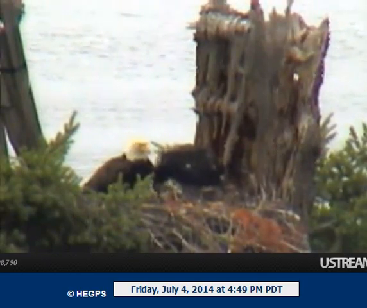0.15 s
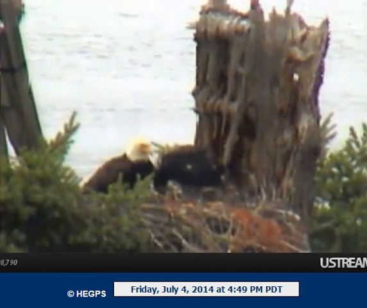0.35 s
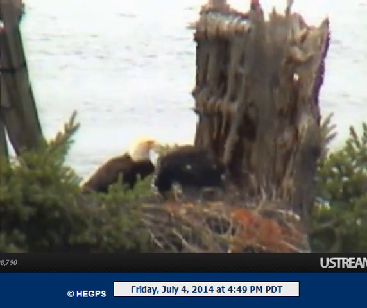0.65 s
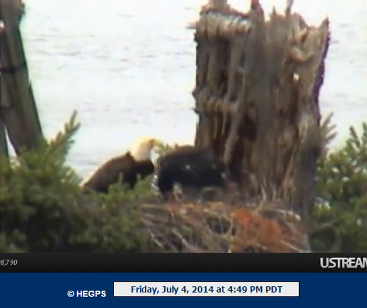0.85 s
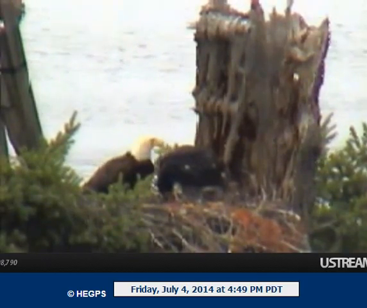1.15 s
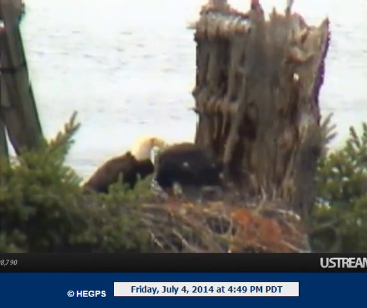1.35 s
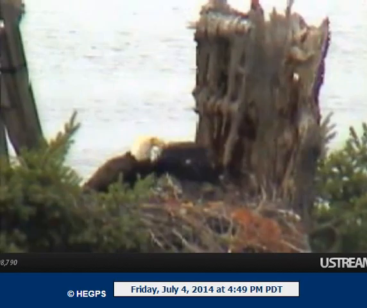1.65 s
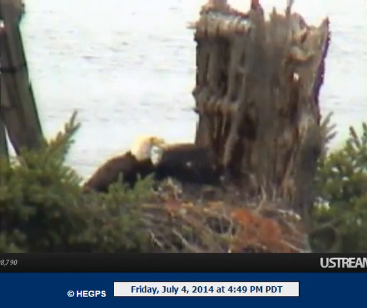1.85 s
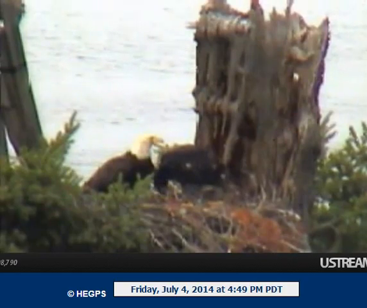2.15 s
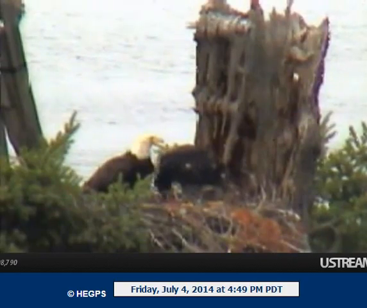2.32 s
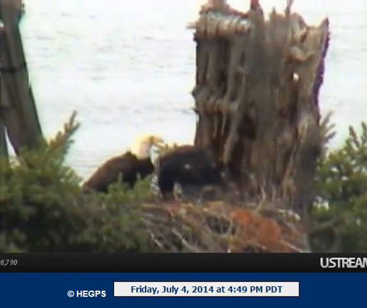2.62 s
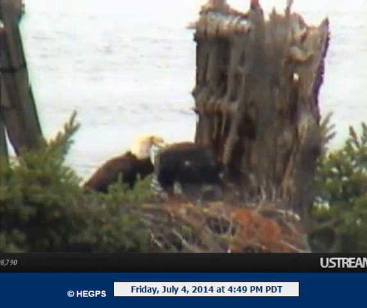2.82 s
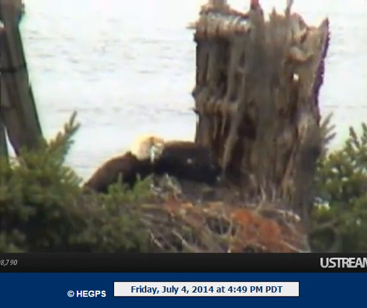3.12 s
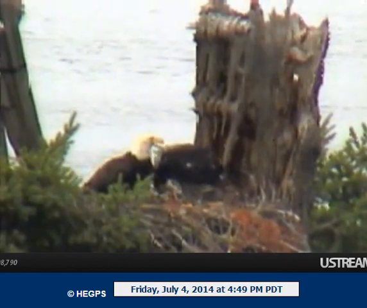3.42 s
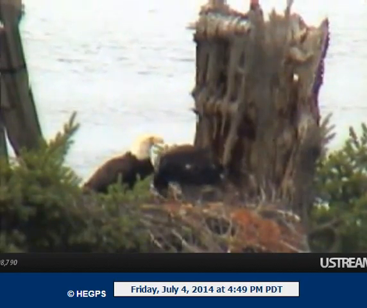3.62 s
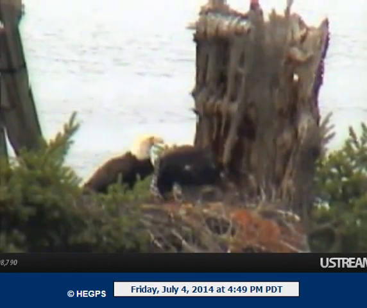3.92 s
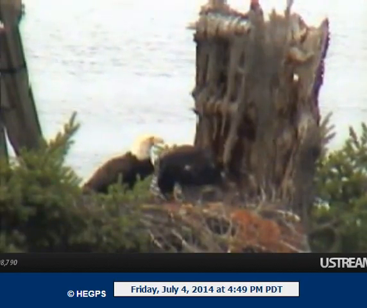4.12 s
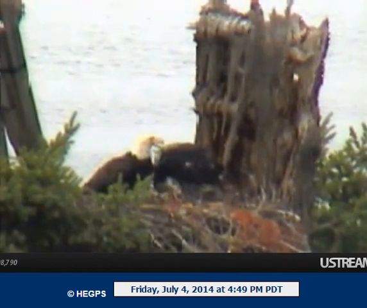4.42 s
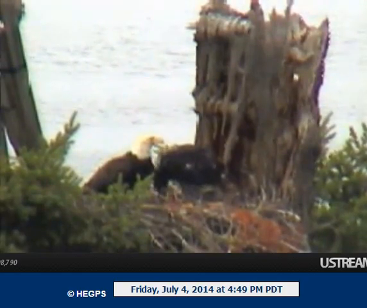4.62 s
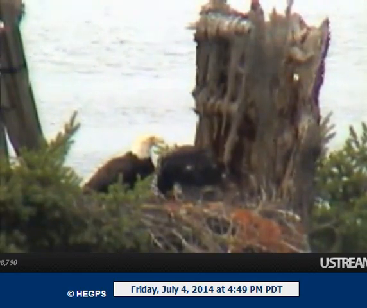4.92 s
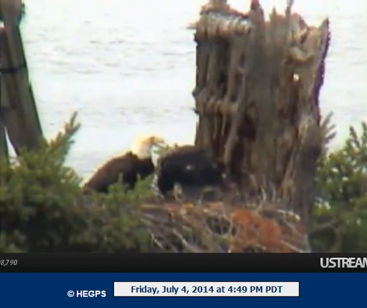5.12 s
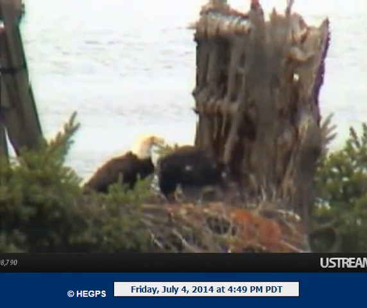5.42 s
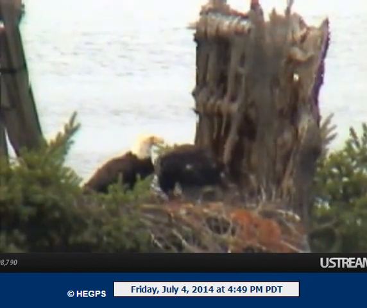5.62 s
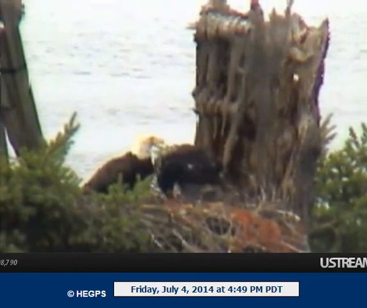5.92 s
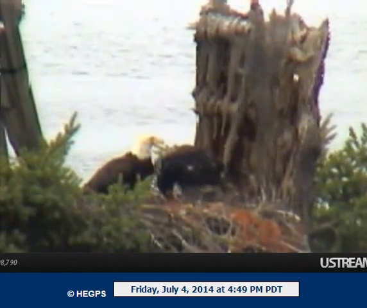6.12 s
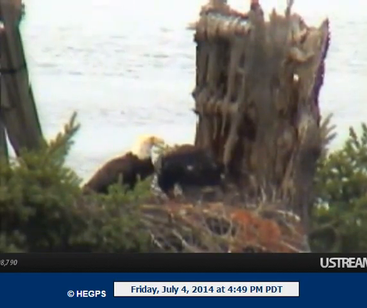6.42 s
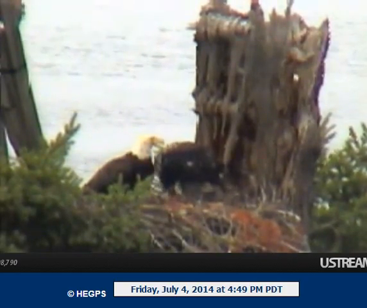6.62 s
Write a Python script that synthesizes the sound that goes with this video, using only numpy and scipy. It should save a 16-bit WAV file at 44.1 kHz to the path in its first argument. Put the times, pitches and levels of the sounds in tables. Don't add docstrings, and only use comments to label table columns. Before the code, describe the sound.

Deep droning wind with thumps dominates; five hoarse caws come in the first two seconds, with weak high eaglet whistles and small twig ticks.

```python
import sys
import numpy as np
from scipy import signal
from scipy.fft import rfft, irfft
from scipy.io import wavfile
from scipy.ndimage import uniform_filter1d

SR = 44100
rng = np.random.default_rng(int(sys.argv[2]) if len(sys.argv) > 2 else 0)


def to_linear_factor(level_db):
    exponent = np.asarray(level_db, float) / 20
    return 10 ** exponent


def store_pcm(level_fs):
    pcm = np.round(np.clip(level_fs, -1, 1) * 32767).astype(np.int16)
    wavfile.write(sys.argv[1], SR, np.atleast_2d(pcm).T)


N = 298116

MAINS_OVERTONES = dict(zip([11, 13, 15, 27, 31, 35, 37, 39, 43, 45, 47, 49, 51, 53, 55, 57, 59, 61, 63, 65],
                   [-56, -59, -58, -62, -62, -64, -64, -65, -66, -68, -63, -67, -70, -65, -64, -65, -69, -67, -70, -71]))
# pitch_hz, density_db (per Hz)
ROAR_COLOUR = [(20, -18.5), (117, 1), (152, -5.5), (184, -13), (201, -19), (229, -24), (316, -31),
               (344, -24.5), (375, -35), (446, -39), (702, -40.5), (1060, -38.5), (2600, -54), (4300, -62)]
# pitch_hz, width_hz, level_db
TUBE_MODES = [(118, 17.9, -12.5), (344.6, 20, -36), (580.6, 55, -42.5), (808, 43, -48.5), (149.9, 3, -25.5),
              (232, 21, -38.5), (521.5, 9.5, -51.5), (636.5, 52, -46.5), (862, 25, -52)]
# time_s, level_db
GUSTS = [
    (0.0, -12.5),
    (0.96, -14.5),
    (1.58, -12.5),
    (2.39, -14.5),
    (2.54, -12.5),
    (2.86, -13.5),
    (3.65, -14.5),
    (4.42, -15.5),
    (5.63, -16),
    (6.76, -13),
]
# centre_s, depth_db
STALLS = [(.06, -10), (.23, -9.5), (.55, -5.5), (.62, -7), (.78, -7), (.91, -4.5), (1.11, -4.5), (1.3, -7),
          (1.39, -4), (1.97, -3), (2.14, -2.5), (2.27, -10), (2.79, -11), (3.019, -7), (3.16, -0.5),
          (3.291, -8), (3.46, -5.5), (3.9, -4.5), (4.14, -1), (4.3, -8.5), (4.4, -1.5), (4.475, -5),
          (4.55, -7.5), (5.22, -3), (5.379, 0.5), (5.499, -0.5), (5.65, 0), (5.76, -2), (6.521, -7.5)]
# centre_s, peak_db, pitch_hz, half_length_s
OVERLOADS = [
    (1.334, -1.5, 118, 0.02),
    (1.443, -1.4, 118, 0.043),
    (1.906, 1.5, 118, 0.015),
    (2.737, 2.1, 106, 0.014),
    (3.12, -1.5, 118, 0.037),
    (3.713, -2, 114.5, 0.016),
    (4.359, -0.7, 113, 0.022),
    (4.441, 0.5, 112, 0.015),
]
# start_s, length_s, pitch_hz, level_db
EDGE_TONES = [
    (0.086, 0.43, 279.6, -29.5),
    (0.676, 0.21, 284.5, -28),
    (3.834, 0.14, 551, -35.5),
    (4.928, .14, 771, -43),
    (6.15, 0.11, 640, -35),
]
# start_s, peak_db, pitch_hz
TWIG_TICKS = [
    (1.2416, -30, 2720),
    (2.7926, -33, 3400),
    (2.9344, -34, 2320),
    (3.6094, -30, 2230),
    (3.6965, -34, 3000),
    (3.7894, -34, 2220),
    (4.9756, -34, 2870),
    (5.0694, -49, 2040),
    (6.2771, -35, 2240),
]
# start_s, length_s, level_db,
# first_hz, last_hz
EAGLET_NOTES = [(.09, .08, -55, 3520, 3430), (.18, .065, -46, 3375, 3395), (.295, .068, -46, 3700, 3690),
                (.39, .1, -48, 3720, 3785), (.508, .065, -45, 3385, 3300), (.565, .16, -47.5, 3350, 3385),
                (.75, .055, -54, 3540, 3490), (.78, .06, -52, 3180, 2900), (1.93, .08, -53, 3420, 3390),
                (2.98, .11, -54, 3000, 2950), (3.365, .05, -57, 2740, 3010), (3.41, .08, -50, 3010, 3190),
                (3.475, .057, -45, 3185, 3200), (4.385, .06, -48, 2830, 2825), (4.77, .06, -50, 3070, 3270),
                (4.89, .105, -53, 2930, 2790), (5.925, .04, -53, 2820, 2820),
                (6.012, .047, -40.5, 2115, 2250), (6.055, .08, -53, 2790, 2770),
                (6.12, .075, -49, 2830, 2850), (6.355, .045, -51, 3010, 2820),
                (6.49, .055, -50, 3080, 3420), (6.565, .07, -52, 3450, 3180),
                (6.638, .025, -39, 2200, 2070),
                (.04, .06, -54, 3200, 3280), (.13, .08, -53, 3220, 3100), (.3, .1, -54, 3200, 3300),
                (.46, .04, -52, 3300, 3480), (.55, .04, -56, 3750, 3780), (3.335, .035, -54, 2900, 2900),
                (4.44, .1, -57, 2815, 2830), (4.78, .07, -53, 3420, 3820), (4.84, .03, -52, 3260, 3300),
                (6.51, .055, -52, 3740, 3790), (6.54, .035, -52, 3330, 3170), (.36, .04, -54, 3740, 3710),
                (.715, .06, -55, 3400, 3330), (.83, .055, -53, 2890, 2920), (3.525, .04, -58, 3200, 3170),
                (4.67, .07, -57, 2900, 2960), (6.0, .025, -46, 2210, 2120), (6.185, .07, -52, 2860, 3090),
                (6.39, .045, -50, 2825, 2850), (.24, .035, -54, 3350, 3310), (6.462, .04, -48, 3065, 3080)]
# start_s, length_s, effort_db, top_hz, roughness (0-1)
CROW_CAWS = [
    (.146, .225, -26.5, 322, .24),
    (.534, .24, -26, 324, .24),
    (.966, .225, -27, 316, .3),
    (1.374, .245, -28, 321, .34),
    (1.822, .24, -28.5, 325, .4),
]
# pitch_hz, width_hz, level_db
CROW_THROAT = [(1436, 330, 5.5), (2227, 584, -8), (1160, 100, -11.5)]
# pitch_hz, level_db
BAND_GATE = [(4050, -110), (4250, -82), (4650, -82), (4900, -90), (6500, -90), (6900, -86), (7400, -88),
             (8200, -86), (9050, -86), (9250, -80)]


def evened(x):
    return x / np.sqrt(np.mean(x ** 2) + 1e-20)


def add(mix, s, sound):
    part = mix[round(s * SR):][:len(sound)]
    part += sound[:len(part)]


def buzz():
    mains_hz = 59.977
    turn = 2 * np.pi * mains_hz * np.arange(N) / SR
    out = np.zeros(N)
    for multiple, db in MAINS_OVERTONES.items():
        out += to_linear_factor(db) * np.sqrt(2) * np.sin(multiple * turn + 2 * np.pi * rng.random())
    return out


def wind_noise():
    hz = np.fft.rfftfreq(N, 1 / SR)
    roar_hz, roar_db = np.transpose(ROAR_COLOUR)
    colour = to_linear_factor(np.interp(np.log(hz + 1), np.log(roar_hz + 1), roar_db))
    total_db = -10.5
    power = to_linear_factor(2 * total_db) * colour ** 2 / np.sum(colour ** 2)
    for mode_hz, width_hz, db in TUBE_MODES:
        peak = 1 / (1 + (2 * (hz - mode_hz) / width_hz) ** 2) ** 2
        power = power + to_linear_factor(2 * db) * peak / peak.sum()
    spectrum = rfft(rng.standard_normal(N)) * np.sqrt(power * len(hz))
    low = 1 / (1 + (hz / 230) ** 6)
    bass = irfft(spectrum * low, N)
    upper = irfft(spectrum * (1 - low), N)
    return bass / np.sqrt(uniform_filter1d(bass ** 2, 3500) + 1e-9), upper


def wind():
    bass, upper = wind_noise()
    clock = np.arange(N) / SR
    gust_s, gust_db = np.transpose(GUSTS)
    tops_db, stall_s = 3.5, 0.018
    level_db = np.interp(clock, gust_s, gust_db) + tops_db
    for centre, depth_db in STALLS:
        level_db += depth_db * np.exp(-((clock - centre) / stall_s) ** 2)
    bass = bass * to_linear_factor(level_db)
    bass = 0.95 * np.tanh(bass / 0.95)
    share, pushes = np.zeros(N), np.zeros(N)
    for centre, db, hz, half_length in OVERLOADS:
        t = np.arange(-half_length, half_length, 1 / SR)
        bell = np.cos(np.pi * t / (2 * half_length)) ** 2
        add(share, centre - half_length, bell)
        add(pushes, centre - half_length, -to_linear_factor(db) * bell * np.cos(2 * np.pi * hz * t))
    return bass * (1 - np.clip(share, 0, 1)) + pushes + upper


def moans():
    out = np.zeros(N)
    for s, length, hz, db in EDGE_TONES:
        t = np.arange(0, length, 1 / SR)
        swell = np.hanning(len(t)) ** 0.5
        add(out, s, to_linear_factor(db) * np.sqrt(2) * np.sin(2 * np.pi * hz * t) * swell)
    return out


def twigs():
    out = np.zeros(N)
    t = np.arange(500) / SR
    peak_s = 0.0009
    shape = (t / peak_s) * np.exp(1 - t / peak_s)
    for s, db, hz in TWIG_TICKS:
        add(out, s, to_linear_factor(db - 1.5) * np.sin(2 * np.pi * hz * t) * shape)
    return out


def trees(x, t60):
    t = np.arange(SR // 2) / SR
    signs = rng.choice([-1.0, 1.0], len(t))
    sparse = rng.random(len(t)) < 0.03
    taps = signs * sparse * to_linear_factor(-60 * t / t60) * (t > 0.008)
    return signal.fftconvolve(x, taps / np.linalg.norm(taps))[:N]


def whistle(length, db, first_hz, last_hz):
    u = np.arange(0, length, 1 / SR) / length
    hz = first_hz + (last_hz - first_hz) * np.sin(np.pi / 2 * u) ** 2
    drift = uniform_filter1d(rng.standard_normal((2, 12000)), 250, axis=1)
    waver, flutter = drift[:, :len(u)] * np.sqrt(250)
    tone = np.sqrt(2) * np.sin(2 * np.pi * np.cumsum(hz * (1 + 0.006 * waver)) / SR)
    level = to_linear_factor(db - 3 * u ** 2 + 2 * flutter)
    return level * tone * signal.windows.tukey(len(u), min(1, 700 / len(u)))


def resonate(x, hz, width):
    turn = np.exp(2j * np.pi * np.cumsum(hz * np.ones(len(x))) / SR)
    r = np.exp(-np.pi * width / SR)
    return 2 * (turn * signal.lfilter([1 - r], [1, -r], x / turn)).real


def throat(drive):
    out = np.zeros(len(drive))
    for k, (hz, width, db) in enumerate(CROW_THROAT):
        out += (-1) ** k * to_linear_factor(db) * resonate(resonate(drive, hz, width), hz, 2 * width)
    return out


def caw(length, effort_db, top_hz, rough):
    t = np.arange(0, length, 1 / SR)
    crest_s, crest_wide_s, sag_s = 0.072, 0.03, 0.15
    opens, closes = 0.88, 0.71
    crest = np.exp(-((t - crest_s) / crest_wide_s) ** 2)
    rest = opens + (closes - opens) * np.clip(t / sag_s, 0, 1) ** 2
    hz = top_hz * (rest + (1 - rest) * crest)
    rough = rough * np.interp(t, [0, crest_s], [0.4, 1])
    jitter, breath, uneven = rng.standard_normal((3, 12000))[:, :len(t)]
    rattle_hz = 36 * (1 + 0.2 * evened(uniform_filter1d(uneven, 1200)))
    rattle = np.cos(2 * np.pi * np.cumsum(rattle_hz) / SR)
    shake = 0.024 * evened(uniform_filter1d(jitter, 150) - uniform_filter1d(jitter, 1000))
    turns = np.cumsum(hz * (1 + shake + 0.015 * rattle)) / SR
    pulses = sum(np.cos(2 * np.pi * k * turns) for k in range(1, 10))
    folds = pulses * (1 + 0.2 * rattle)
    puffs = (0.25 + np.exp(-(turns % 1) / 0.29)) * breath
    voice = throat((1 - rough) * evened(folds) + rough * 2.6 * evened(puffs))
    rise_s, end_s, fade_db = 0.049, 0.05, -9
    shape = np.clip(np.minimum(t / rise_s, (length - t) / end_s), 0, 1)
    return to_linear_factor(effort_db + 0.5) * evened(voice) * shape * to_linear_factor(fade_db * (t / length) ** 2)


def scene():
    background = buzz() + wind() + moans() + twigs()
    eaglet, crow = np.zeros(N), np.zeros(N)
    for s, *note in EAGLET_NOTES:
        add(eaglet, s, whistle(*note))
    for s, *call in CROW_CAWS:
        add(crow, s, caw(*call))
    eaglet = eaglet + to_linear_factor(-9) * trees(eaglet, t60=0.3)
    crow = crow + to_linear_factor(-6) * trees(crow, t60=0.45)
    return (background + eaglet + crow)[None]


def low_pass(x, hz, order):
    taps = signal.firwin(order, hz, window=("kaiser", 9), fs=SR)
    return signal.oaconvolve(np.pad(x, order // 2, "reflect"), taps, "valid")


def slipping_converter(line):
    slip_hz = 3900
    turn = 2 * np.pi * slip_hz * np.arange(N) / SR
    slip = to_linear_factor(-5.5) * np.sin(turn) + to_linear_factor(-10) * np.sin(2 * turn)
    thin = signal.lfilter(*signal.butter(1, [220, 2600], "bandpass", fs=SR), line)
    return line + slip * np.gradient(thin)


def muted(x):
    hz, _, z = signal.stft(x, SR, nperseg=2048, noverlap=1536, boundary="even")
    power = uniform_filter1d(abs(z) ** 2, size=5, axis=0)
    power = uniform_filter1d(power, size=6, axis=1)
    limit_db = np.interp(hz, *np.transpose(BAND_GATE))[:, None] - 5.5
    short_db = limit_db - 10 * np.log10(abs(power) + 1e-20)
    keep = 1 / (1 + np.exp(np.clip(2 * short_db, -50, 50)))
    return signal.istft(z * keep, SR, nperseg=2048, noverlap=1536)[1][:N]


def band_limit(x):
    return signal.sosfilt(signal.butter(12, 15700, fs=SR, output="sos"), x)


def record(dry):
    line = low_pass(dry[0], 4050, order=401)
    line = line - 0.034 * np.clip(line, -1.5, 1.5) ** 3
    hiss, grain = rng.standard_normal((2, N))
    slipped = slipping_converter(line) + to_linear_factor(-76) * hiss
    sent = muted(low_pass(slipped, 9320, order=121))
    grain = to_linear_factor(-86) * (grain - low_pass(grain, 10600, order=101))
    return band_limit(np.clip(sent + grain, -1, 1)[None])


dry = scene()
out = record(dry)
store_pcm(out)
```